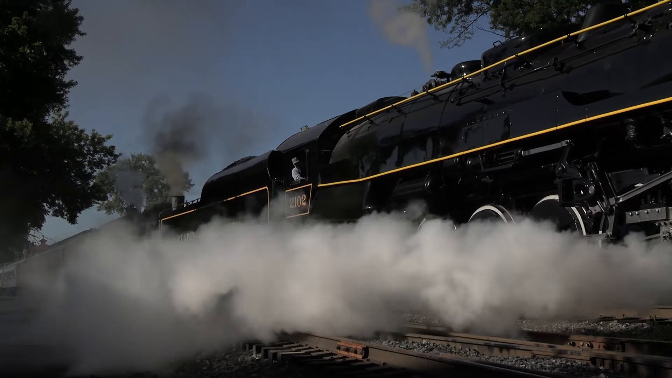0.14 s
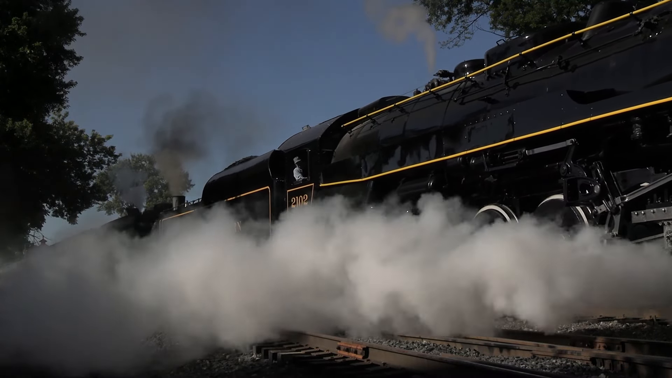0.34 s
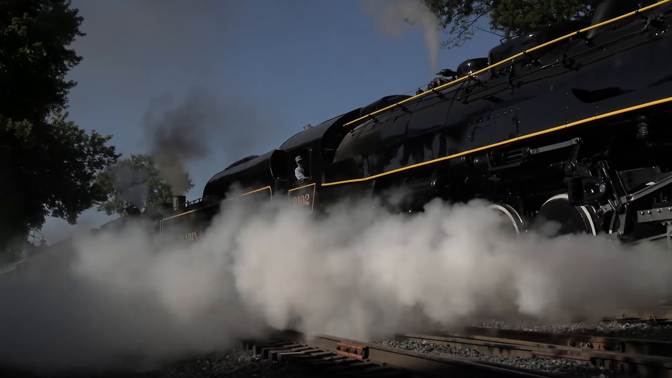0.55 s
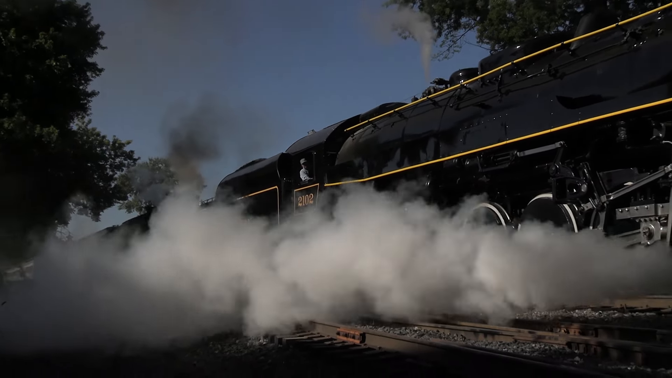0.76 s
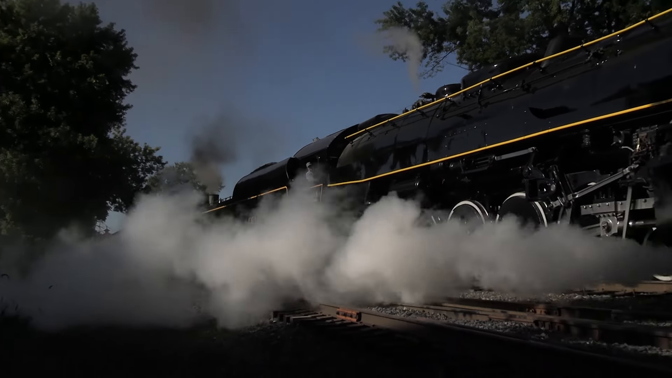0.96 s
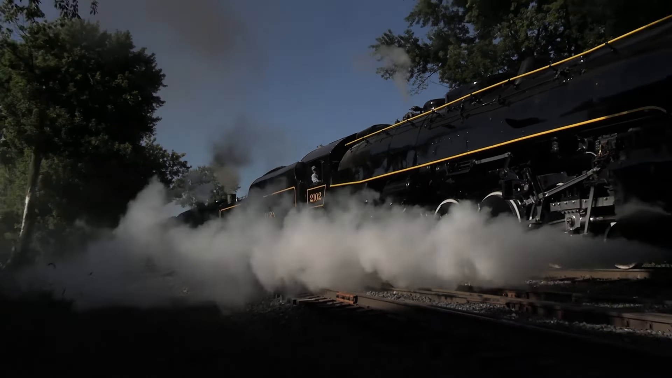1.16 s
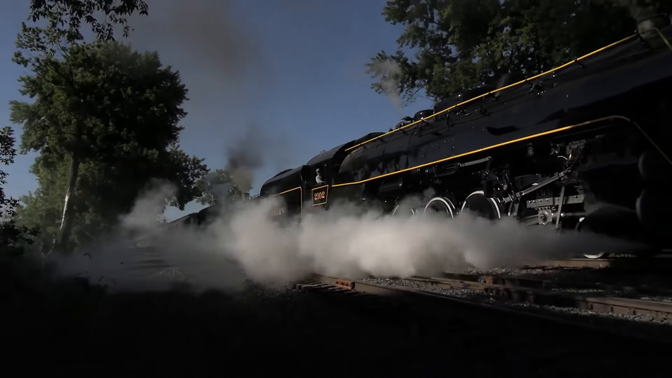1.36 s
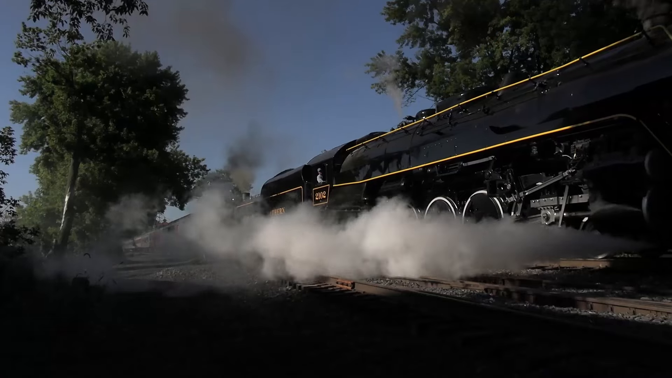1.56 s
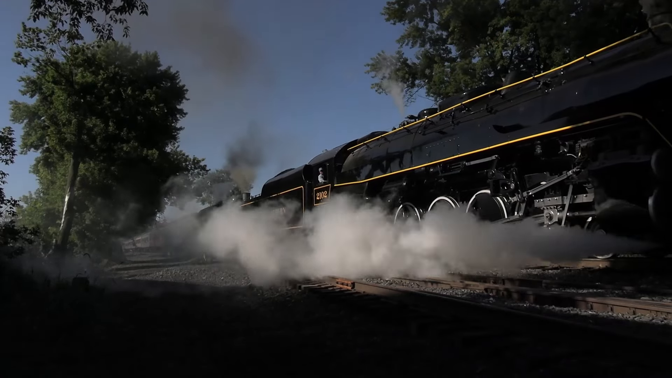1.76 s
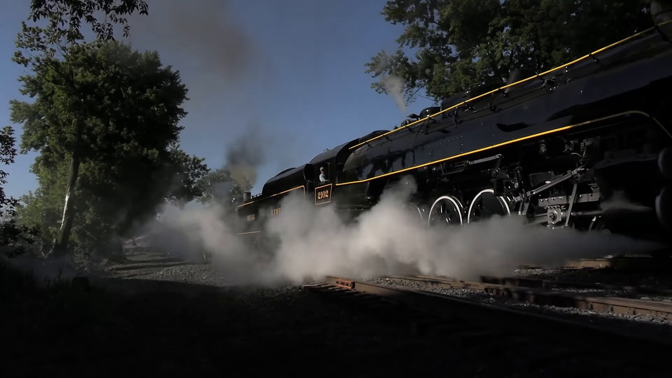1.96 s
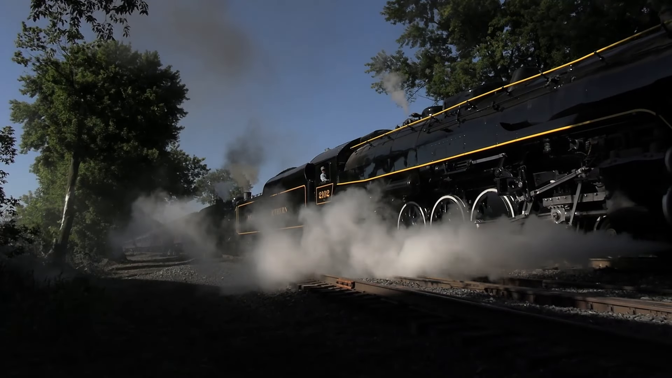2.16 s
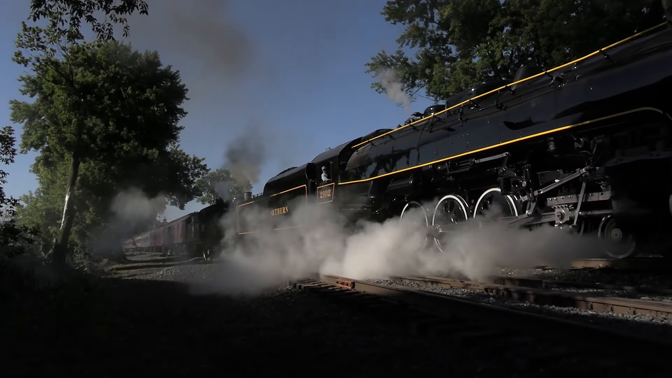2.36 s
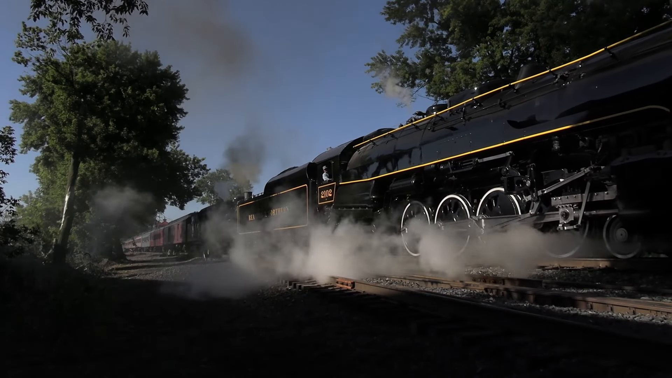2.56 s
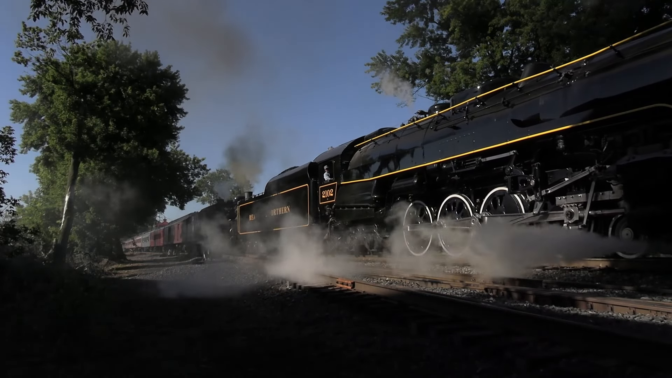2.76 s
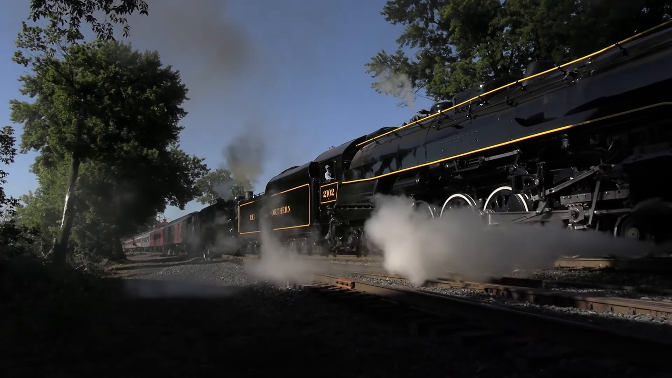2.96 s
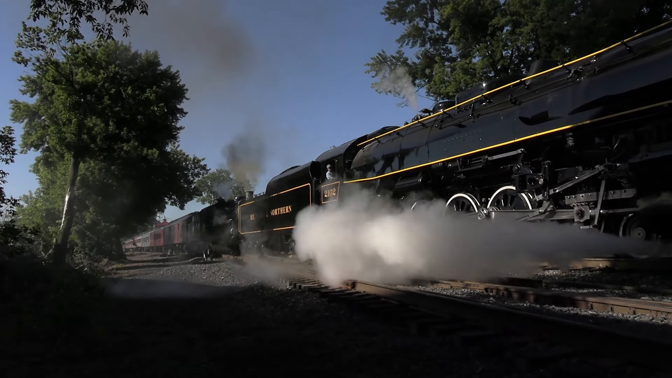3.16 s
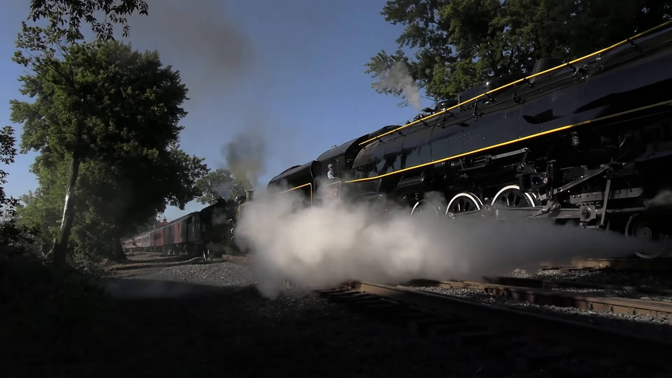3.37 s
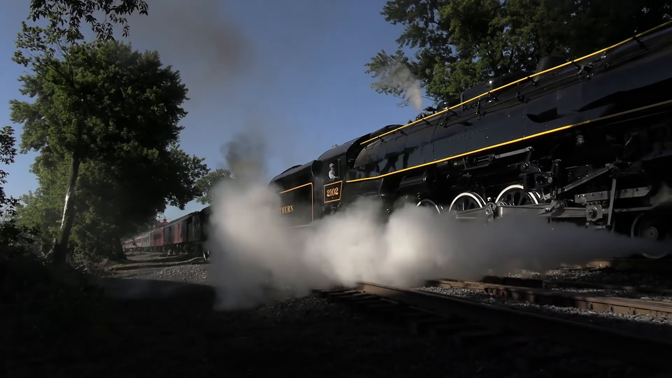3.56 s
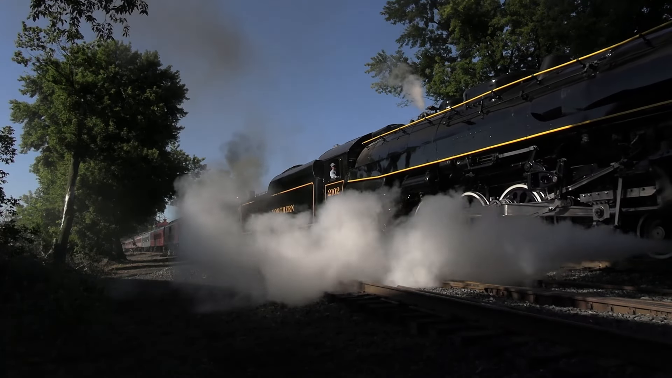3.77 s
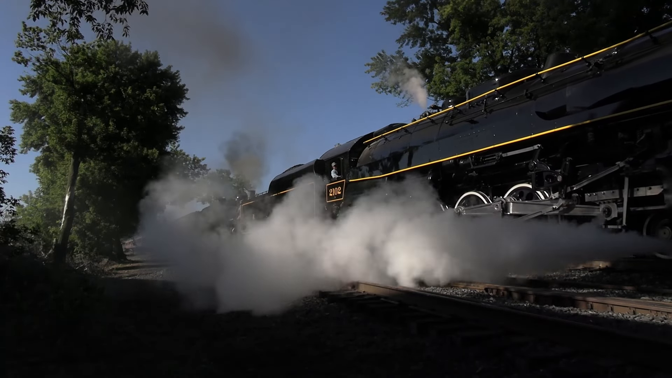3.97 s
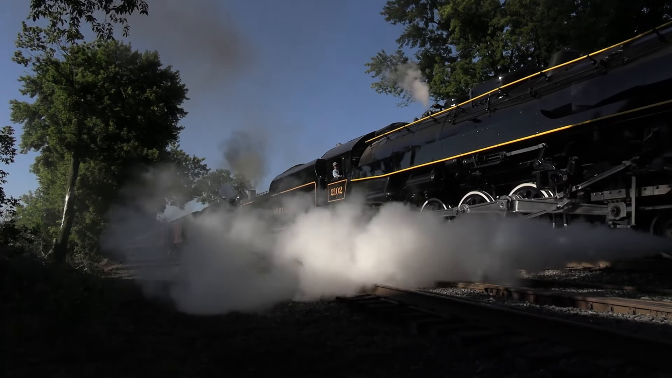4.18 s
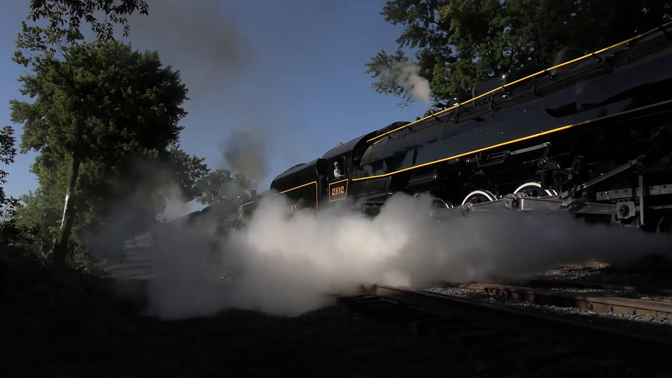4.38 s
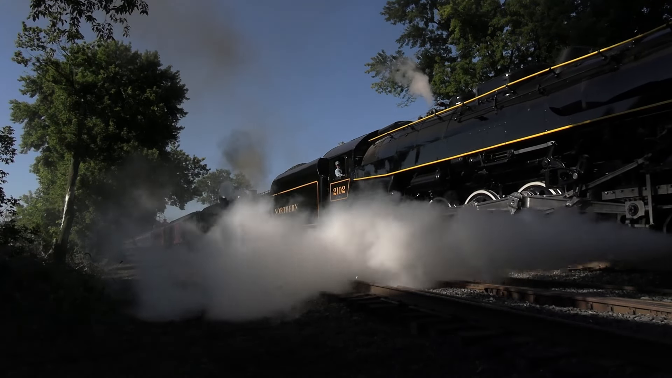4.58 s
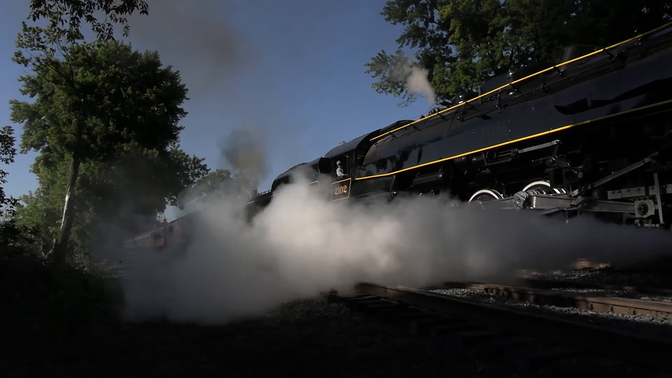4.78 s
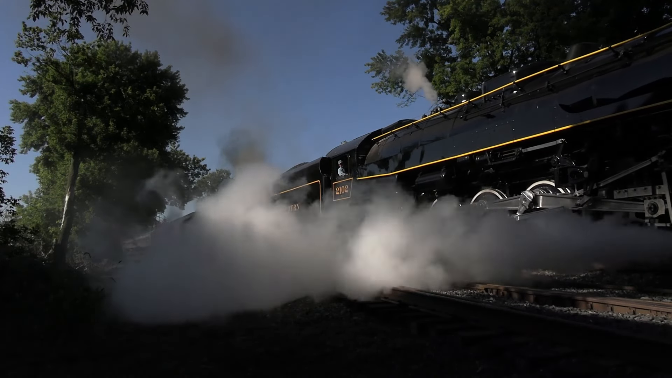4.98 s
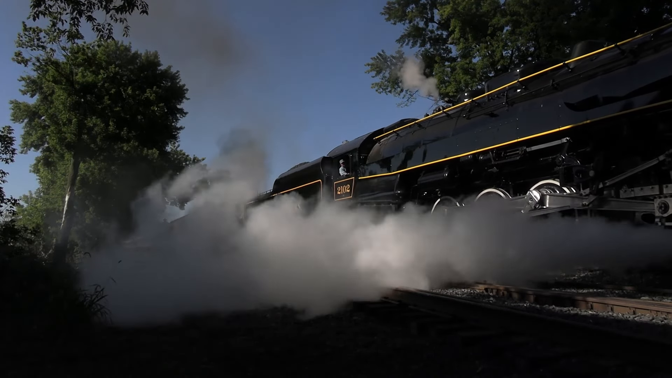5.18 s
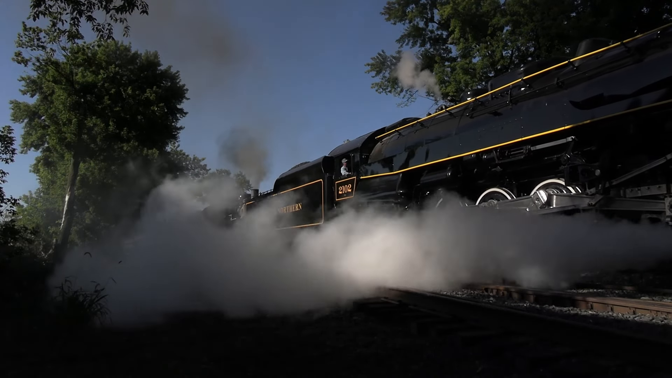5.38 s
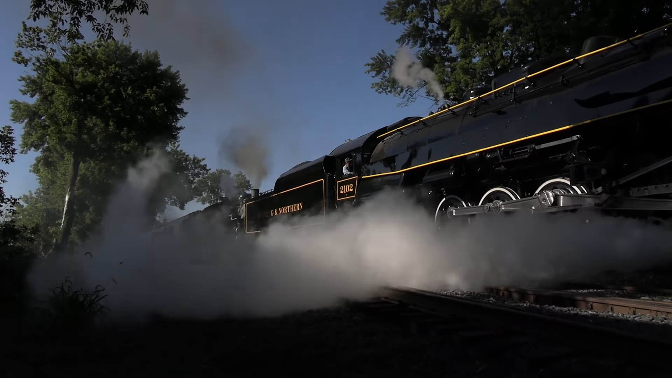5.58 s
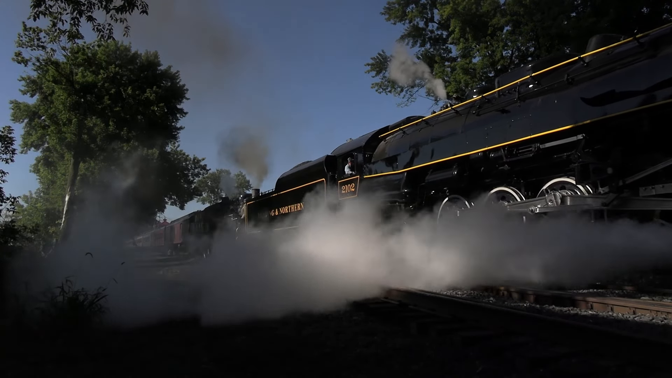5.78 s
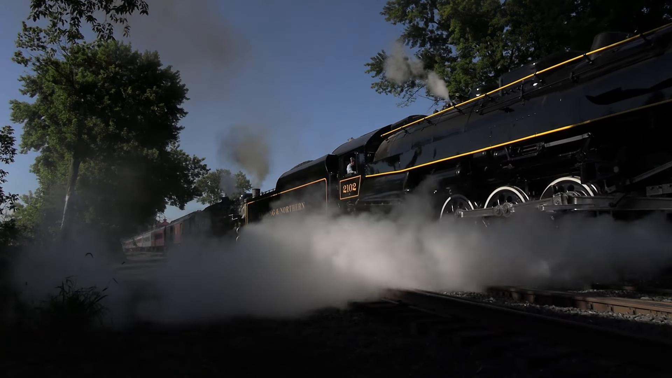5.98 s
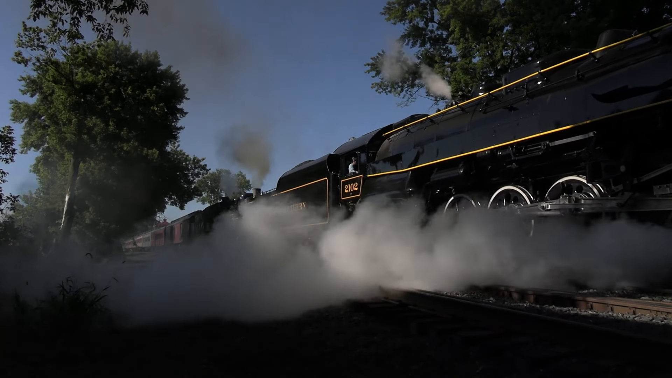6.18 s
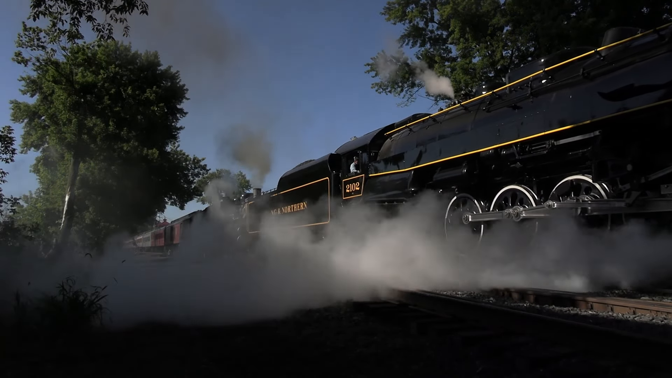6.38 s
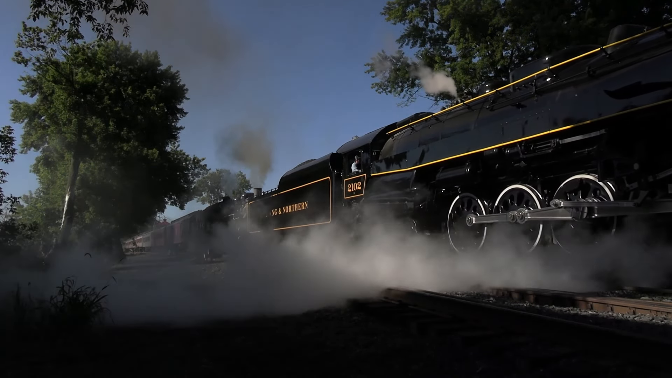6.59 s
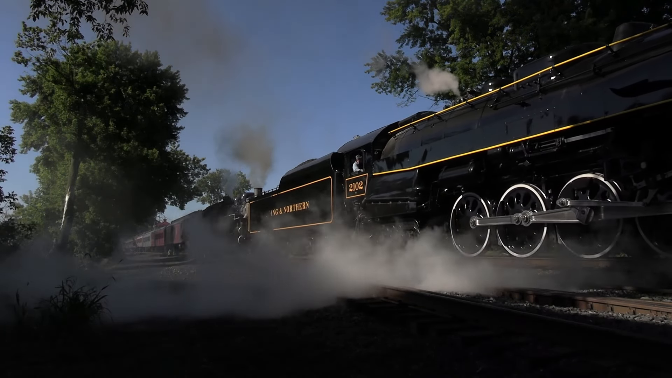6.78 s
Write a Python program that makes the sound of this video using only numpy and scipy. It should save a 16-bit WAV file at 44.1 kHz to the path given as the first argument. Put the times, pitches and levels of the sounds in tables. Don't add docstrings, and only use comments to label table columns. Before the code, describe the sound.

A steam locomotive pulls away a few metres off. A broad roaring hiss gradually fades, with a tiny metal clink early on. A soft low chuff sounds as only a duller leak remains, then a second jet bursts open, fluttering and spitting water. It weakens unevenly and shuts to a faint leak with another muffled chuff. Outdoors, close stereo microphone, short reflections from ground and metal.

```python
import sys
import numpy as np
from scipy import signal
from scipy.fft import rfft, irfft
from scipy.io import wavfile
from scipy.ndimage import uniform_filter1d

SR = 44100
rng = np.random.default_rng(int(sys.argv[2]) if len(sys.argv) > 2 else 0)


def generate_wav(sig):
    pcm = np.round(np.clip(np.atleast_2d(sig).T, -1, 1) * 32767).astype(np.int16)
    wavfile.write(sys.argv[1], SR, pcm)


def rack_gain(trim_db):
    fader = np.asarray(trim_db, float)
    return 10 ** (fader / 20)


N = 301644
T = np.arange(N) / SR
SLOW = T[::32]
HZ = np.fft.rfftfreq(N, 1 / SR) + 1e-3

# (t/s, hand-over/s)
FRONT_SHUTS, REAR_OPENS, REAR_TIRES, REAR_SHUTS = (2.22, .09), (2.77, .05), (3.8, 1.3), (6.45, .05)

# (t/s, level/dB, wetness as treble tilt/(dB per octave))
FLOW = [(0, -30.5, 0), (.16, -29.5, 0.5), (.22, -30, 0), (1.0, -33, 0.3), (1.35, -33, 0.3),
        (1.85, -35.5, 0), (1.95, -37, -0.1), (2.76, -36.5, 0), (2.82, -30, 0.5), (3.0, -31, 0),
        (3.25, -31, 0.5), (3.7, -31.5, 0.5), (4.1, -31, 0.1), (4.72, -30.5, -0.8), (4.85, -31.5, -0.8),
        (5.05, -34.5, -0.8), (5.45, -34, -0.4), (5.95, -34.5, -0.3), (6.25, -41, 0), (6.84, -37, -0.5)]
# (t/s, level/dB, length/s)
SLUGS = [(0.09, 0, 0.08), (.165, -1.5, .04), (.2, -3.5, 0.044), (.6, -0.5, .1), (1.2, 0, .06),
         (1.55, -1.5, .1), (1.9, 0, .06), (0.942, -2, 0.087), (2.332, -1.5, 0.16), (2.966, 1, 0.036),
         (3.0, -4.5, 0.04), (3.092, -1, .07), (2.775, -3, .02), (4.708, -0.5, .04), (4.873, -0.5, .07),
         (5.22, -0.5, .04), (5.44, 0, .05), (6.35, .5, .05), (6.45, -2, .04), (4.2, 1.5, .05),
         (3.87, .5, .06), (4.61, -0.5, .04), (5.68, -0.5, .06), (6.17, 2.5, .04), (2.84, 2.5, 0.044),
         (2.922, -2.5, .03), (3.258, 1.5, 0.07), (3.335, -0.5, .05), (3.644, -2.5, .05), (3.726, 1.5, .06),
         (4.292, -2, .04), (5.185, 2.5, .04), (6.06, 0, .03), (3.46, 2.5, 0.11), (3.527, -3, 0.054),
         (3.955, -0.5, .04), (4.01, 2.5, 0.045), (4.088, 4, .08), (4.15, 0, .05), (4.384, 3.5, 0.07),
         (4.44, -4, 0.08), (4.67, 2.5, .08), (5.078, 0, .05), (5.145, -1.5, 0.049), (5.297, 1, .06),
         (5.4, 1.5, 0.12), (5.543, 2, 0.074), (5.595, -1, 0.072), (5.73, -3, .06), (5.8, -3, .04),
         (5.92, 0.5, .05), (5.974, -2.5, .05), (6.02, 2, .05), (6.095, 4.5, 0.05), (6.235, 1.5, .06),
         (6.303, 5.5, 0.055), (6.408, 2.5, 0.053)]
# (t/s, level/dB, decay/s, centre/octave above 1 Hz)
POPS = [
    (0, 3, .18, 11.6),
    (2.79, 5.5, .075, 9.4),
    (2.764, 5.5, .035, 9.6),
    (4.41, -2, .09, 11.3),
    (6.45, 1.5, .4, 11.4),
    (4.55, -2, .3, 9.5),
    (4.8, -1.2, .2, 11),
]

# (f/Hz, level/dB)
FRONT_COLOUR = [(30, -44), (90, -28), (250, -20), (500, -14.5), (800, -7.5), (1700, -3.5), (3000, -1.5),
                (4100, -1.5), (4700, -2.5), (6000, -2), (6500, -3), (9000, -8), (10900, -9), (12500, -15.5),
                (13500, -18), (15500, -25)]
LEAK_COLOUR = [(30, -46), (100, -19), (300, -16.5), (700, -8), (1700, -2.5), (3300, -1), (5000, -1.5),
               (7400, -4), (9000, -7.5), (10900, -10), (12500, -19), (14000, -24), (15600, -30)]
REAR_COLOUR = [(30, -48), (120, -28.5), (470, -17), (620, -13.5), (1000, -5.5), (2000, -3), (2750, 0),
               (4800, -6.5), (6500, -5), (9000, -11), (10800, -11), (11700, -15), (12700, -17),
               (15500, -28)]
SPENT_COLOUR = [(30, -53), (120, -28.5), (470, -18.5), (620, -13), (1000, -5), (2000, -2.5), (2900, -1.5),
                (4200, -5), (4800, -5.5), (5600, -3.5), (6500, -4.5), (7200, -6.5), (8000, -6),
                (9000, -8.5), (10800, -5.5), (11700, -11), (13300, -15.5), (15500, -23.5)]
# (f/Hz, likeness/0-1, right's phase lead/rad, left minus right/dB)
FRONT_PORTS = [(60, .8, 0, .5), (700, .87, .3, -1), (1800, .7, .5, -1.5), (3000, .56, 1, -2.5),
               (4000, .18, .4, -1.5), (5500, .33, 0, -3), (7000, .05, -.5, -4.5), (8000, .3, -.6, -2.5),
               (10700, .6, -.4, -3.5), (11800, .58, -.5, -4.5), (13200, .53, -.9, -2),
               (14500, .33, -.5, -1.5), (15700, .9, 0, 0)]
LEAK_PORTS = [(60, .9, 0, .5), (600, .92, .5, -1.5), (1800, .45, .8, -3.6), (3000, .27, 1.3, -5.3),
              (4500, .2, -.6, -5.7), (6000, .38, -1, -3), (7500, .6, -.6, -2.5), (10700, .72, -.1, -2.5),
              (12000, .65, 0, -3), (14200, .25, 0, -2.5), (15700, .85, 0, 0)]
REAR_PORTS = [(60, .75, 0, 0), (1000, .85, .5, -1.7), (1800, .7, .65, -2.3), (2800, .68, 1.4, -4.2),
              (3500, .3, 1.8, -4), (4500, .1, 1.2, -3), (5300, .33, .3, -5), (6500, .06, 2.5, -7.7),
              (8000, .42, 4.8, -4), (9500, .63, 5.5, -2.5), (11200, .65, 5.8, -5), (13200, .58, 5.6, -2),
              (14500, .4, 5.9, -1), (15700, .9, 6.28, 0)]
SPENT_PORTS = [(60, .65, 0, 0), (350, .58, .2, -1.3), (600, .8, .4, -1.5), (1000, .88, .6, -1.7),
               (1800, .72, 1, -2.6), (2600, .6, 1.6, -5.5), (3500, .36, 2.5, -4.5), (4200, .12, 4, -4),
               (5000, .22, 5.5, -6.5), (5700, .25, 7.6, -7.3), (6500, .5, 9.8, -8), (8500, .68, 11.4, -2.5),
               (10700, .82, 12, -3.5), (12000, .75, 12, -4.5), (13200, .72, 12.3, -2),
               (14500, .5, 12.4, -.5), (15700, .9, 12.57, 0)]
# (f/Hz, width/Hz, level/dB)
RIDGES = [
    (3120, 490, 2),
    (3340, 330, 2.5),
    (3030, 180, 0.5),
    (2870, 510, 1.5),
]

# (t/s, level/dB, rise/s, fall/s, top f/Hz)
CHUFFS = [
    (0, -59, .01, 0.2, 300),
    (2.215, -52, 0.088, 0.084, 560),
    (2.76, -61, .04, 0.15, 302),
    (6.462, -52.5, 0.072, 0.09, 800),
    (6.6, -72, .1, .35, 220),
    (6.52, -58, .012, .02, 750),
]
# (f/Hz, width/Hz, level/dB)
STACK_MODES = [(95, 50, -9), (140, 40, -5), (220, 26, -1), (314, 41, 8.5), (430, 120, 5), (800, 340, 7)]
# (t/s, f/Hz)
CLINKS = [(.274, 1720), (6.479, 955), (2.31, 214), (2.43, 213), (2.34, 96), (6.55, 310), (6.478, 555),
          (6.5, 215), (6.69, 400), (2.365, 485), (2.31, 345)]
# (level/dB, length/s)
CLINK_SIZES = [(-35.5, .028), (-42, 0.019), (-53, 0.093), (-58, .05), (-61, .09), (-64, .055), (-52, .025),
               (-61, .05), (-55, .035), (-58, .035), (-54, .04)]
# (from t/s, to t/s, f/Hz, width/Hz, level/dB)
HUMS = [(1.5, 0.98, 765, 33, -57.5), (1, 1.96, 447, 47, -67), (3.0, 4.7, 620, 28, -61.5),
        (3, 3.02, 428, 21, -61), (1, 2.6, 180, 50, -72), (0, 1.2, 1125, 70, -53.5),
        (5.5, 6.15, 3200, 120, -51), (0.5, 0.57, 1710, 81, -52), (3.5, 4.95, 2400, 88, -51),
        (0, 2.1, 5950, 150, -58), (4.5, 4.6, 1990, 80, -48)]

GROUND_DB = [
    -8,
    -10.5,
    -9,
    -15.5,
]
# (t/s, added metal delay/ms, ground delay/ms)
ROLL = [(0, .1, 3.42), (.8, 0, 3.4), (2.2, 0, 3.4), (2.76, -.12, 3.5), (2.8, 0, 3.65), (3.05, .03, 3.75),
        (3.5, .3, 3.95), (4, .4, 4.15), (4.7, .44, 4.3), (5.3, .58, 4.25), (6.84, .6, 4.2)]
# (from t/s, to t/s, delay/ms, sign)
ECHOES = [(-1, .8, 3.12, -1), (-1, .7, 1.72, 1), (0, 1.9, 3.54, 1), (.55, 1.1, 2.41, 1),
          (1.1, 1.9, 2.44, 1), (1, 1.8, 2.87, 1), (1.75, 2.7, 2.63, -1), (1.2, 1.6, 4.81, -1),
          (.3, 1, 3.86, -1), (2.6, 3.1, 1.94, -1), (2.7, 3.8, 2.53, 1), (3.8, 6.5, 2.53, 1),
          (2.75, 3.25, 3.64, 1), (3.45, 3.8, 3.36, -1), (4.75, 6.6, 3.38, -1), (4.45, 5.1, 3.95, -1),
          (5.1, 6.5, 3.99, -1), (5.3, 5.9, 1.36, -1), (3.3, 3.8, 3.93, -1), (3, 3.5, 5.05, -1),
          (4.1, 5, 2.17, 1)]
ECHO_DB = [-12, -22, -20.5, -17, -16.5, -14, -22, -14, -16.5, -26, -14, -16.5, -10, -16, -16.5, -7, -12,
           -20, -17, -20, -19]
# (from t/s, to t/s, delay/ms, sign)
RIDING = [(.2, 1.6, .83, -1), (1.6, 2.7, .84, -1), (2.6, 4.3, .97, 1), (4.7, 5.2, .97, 1),
          (5.2, 6.1, .96, 1), (3.8, 4.5, 3.59, 1), (5, 5.5, 3.65, 1), (4, 5, 2.01, -1), (3, 3.6, 1.25, -1)]
RIDING_DB = [-21, -37, -18, -20, -19, -17, -23, -22, -27]


def over_hz(table):
    hz, *columns = np.transpose(table)
    return [np.interp(np.log(HZ), np.log(hz), column) for column in columns]


def noise():
    return rfft(rng.standard_normal(N))


def walk(rate):
    hold = int(SR / rate)
    held = rng.standard_normal(N // hold + 1)[np.arange(0, N, 32) // hold]
    slewed = uniform_filter1d(uniform_filter1d(held, hold // 32), hold // 32)
    return slewed / slewed.std()


def ramp(s, length):
    return np.clip((T - s) / length, 0, 1)


def valve():
    front_shut = ramp(*FRONT_SHUTS)
    rear = ramp(*REAR_OPENS) - ramp(*REAR_SHUTS)
    tired = ramp(*REAR_TIRES)
    return np.array([1 - front_shut, front_shut - rear, rear * (1 - tired), rear * tired])


def hums():
    out = 0
    for start, end, hz, width_hz, db in HUMS:
        tone = irfft(noise() / (1 + (2 * (HZ - hz) / width_hz) ** 2), N)
        pan_db = -4.5 * min(hz / 2500, 1) * np.array([[.5], [-.5]])
        swell = ramp(start, .1) * (1 - ramp(end - .2, 0.24))
        out = out + rack_gain(db + pan_db) * swell * tone / tone.std()
    return out


def rods():
    out = 0
    for (s, hz), (db, length) in zip(CLINKS, CLINK_SIZES):
        arch = np.sin(np.pi * np.clip((T - s) / length, 0, 1)) ** .5
        out = out + rack_gain(db) * arch * np.sin(2 * np.pi * hz * T)
    return out


def stack(spread=0.26, hold_s=0.027):
    power = sum(rack_gain(2 * db) / (1 + (2 * (HZ - f) / width) ** 2) for f, width, db in STACK_MODES)
    tube = np.sqrt(power) * HZ ** 2 / (HZ ** 2 + 70 ** 2)
    out = 0
    for s, db, rise, fall, top_hz in CHUFFS:
        mid, side = (irfft(noise() * tube / (1 + (HZ / top_hz) ** 4), N) for _ in range(2))
        age = np.clip(T - s, 0, None)
        decay = np.exp(-np.clip(age - rise - hold_s, 0, None) / fall)
        puff = np.where(age < rise, np.sin(np.pi / 2 * age / rise), decay)
        ports = mid + spread * side * np.array([[1], [-1]])
        out = out + rack_gain(db) * puff * ports / mid.std()
    return out


def jet(colour, ports, ridge_hz, width_hz, sing_db):
    gain = rack_gain(over_hz(colour)[0] + sing_db / (1 + (2 * (HZ - ridge_hz) / width_hz) ** 2))
    like, lead, pan_db = over_hz(ports)
    like = np.clip(like, 0, 1)
    shared = np.sqrt(like) * noise()
    left = shared + np.sqrt(1 - like) * noise()
    right = shared * np.exp(1j * lead) + np.sqrt(1 - like) * noise()
    centre = np.sqrt((rack_gain(pan_db) + rack_gain(-pan_db) + 2 * like * np.cos(lead)) / 4)
    pair = np.array([left * rack_gain(pan_db / 2), right * rack_gain(-pan_db / 2)]) * gain / centre
    return irfft(pair, N) / np.sqrt(np.mean(gain ** 2))


def steam(eddy_db=0.14, sputter_db=1.46, dry=0.39, patch_db=0.72, pivot_octave=11.77):
    shares = valve()
    colours = FRONT_COLOUR, LEAK_COLOUR, REAR_COLOUR, SPENT_COLOUR
    ports = FRONT_PORTS, LEAK_PORTS, REAR_PORTS, SPENT_PORTS
    jets = [jet(c, p, *ridge) for c, p, ridge in zip(colours, ports, RIDGES)]
    blow = rfft(sum(np.sqrt(share) * x for share, x in zip(shares, jets)))

    s, *columns = np.transpose(FLOW)
    flow_db, tilt_db = (np.interp(SLOW, s, column) for column in columns)
    slug_db = sum(db * np.exp(-(2 * (SLOW - s) / length) ** 2) for s, db, length in SLUGS)
    pops = [(db * (SLOW >= s) * np.exp(-abs(SLOW - s) / decay), centre) for s, db, decay, centre in POPS]
    wet = 1 - (1 - dry) * np.interp(SLOW, T, shares[:2].sum(axis=0))
    eddy, sputter = walk(24), walk(34)
    sputter = sputter - uniform_filter1d(sputter, SR // 384)

    pitch = np.log2(HZ)
    rest_db = -33.5
    out = 0
    for octave in np.arange(5, 14.6, .5):
        treble = np.clip((octave - 11.9) / 0.94, 0, 1)
        follows = np.interp(octave, [7, 8.3, 9.5], [0.63, 0.89, 1])
        db = rest_db + follows * (flow_db - rest_db)
        db = db + tilt_db * np.clip(octave - pivot_octave, -2, 3)
        db = db + (0.34 + (0.84 - 0.34) * treble) * slug_db
        db = db + eddy_db * eddy + sputter_db * treble * wet * sputter + patch_db * walk(12)
        db = db + sum(pop_db * np.exp(-(octave - centre) ** 2) for pop_db, centre in pops)
        band = irfft(blow * np.clip(1 - 2 * abs(pitch - octave), 0, 1), N)
        out = out + np.interp(T, SLOW, rack_gain(db)) * band
    return out


def late(v, ms):
    return np.array([np.interp(T - ms / 1000, T, port, left=0) for port in v])


def echo(v, start, end, ms, fade_s=.2):
    out, span = np.zeros_like(v), (T > start) & (T < end + fade_s)
    fade = (ramp(start, fade_s) - ramp(end, fade_s))[span]
    out[:, span] = [fade * np.interp((T - ms / 1000)[span], T, port, left=0) for port in v]
    return out


def bounce(x, ballast_hz=800, rough_hz=4500):
    spectrum = rfft(x)
    low = 1 / (1 + (HZ / ballast_hz) ** 4)
    bass = irfft(spectrum * low, N)
    middle = irfft(spectrum * (1 - low) / np.sqrt(1 + (HZ / rough_hz) ** 2), N)
    s, *columns = np.transpose(ROLL)
    roll_ms, ground_ms = (np.interp(T, s, column) for column in columns)

    metal = 0
    for paths, levels, path_roll_ms in ((ECHOES, ECHO_DB, roll_ms), (RIDING, RIDING_DB, 0)):
        for (start, end, ms, sign), db in zip(paths, levels):
            metal = metal + sign * rack_gain(db) * echo(middle, start, end, ms + path_roll_ms)
    ground = rack_gain(np.dot(GROUND_DB, valve())) * late(bass, ground_ms)
    shell = irfft(spectrum * np.exp(-2j * np.pi * HZ * 0.73 / 1000) / (1 + (5000 / HZ) ** 4), N)
    return x + metal - ground + rack_gain(-25) * shell


def scene():
    return bounce(steam() + stack()) + rods() + hums()


def band_limit(x):
    return signal.sosfilt(signal.butter(12, 16190, fs=SR, output="sos"), x)


def record(dry):
    top_hz = 15720
    mix = irfft(rfft(dry) * (HZ < top_hz), N)
    return band_limit(mix)


dry = scene()
out = record(dry)
generate_wav(out)
```